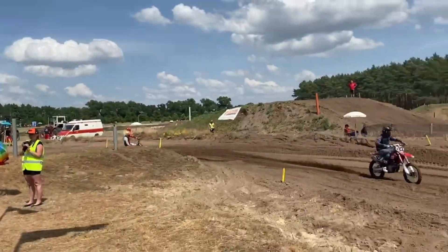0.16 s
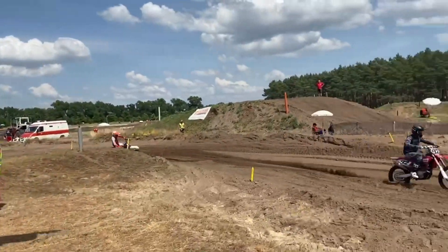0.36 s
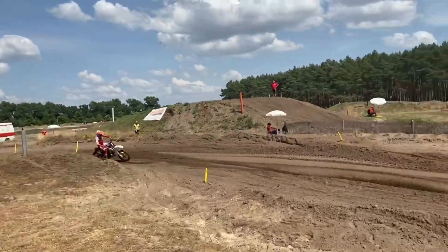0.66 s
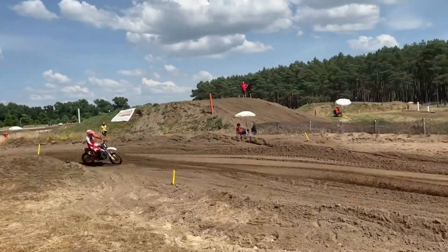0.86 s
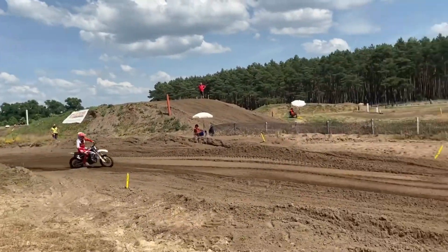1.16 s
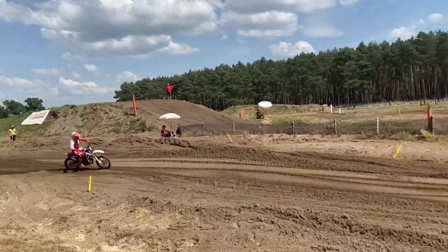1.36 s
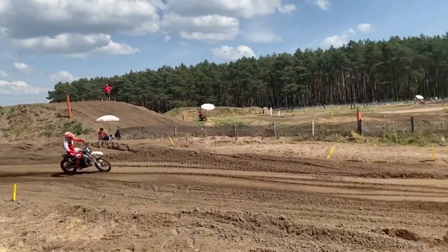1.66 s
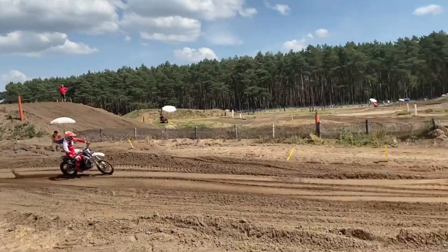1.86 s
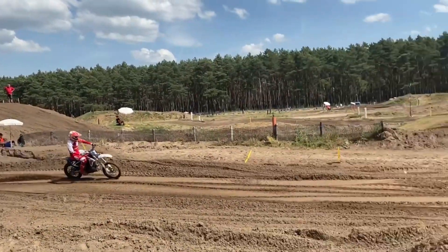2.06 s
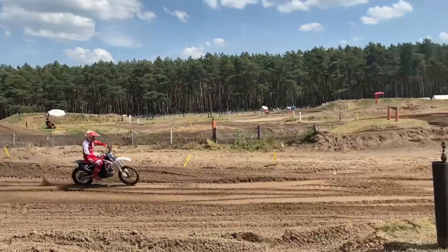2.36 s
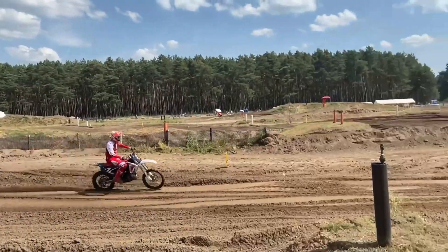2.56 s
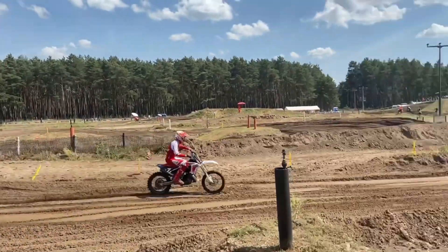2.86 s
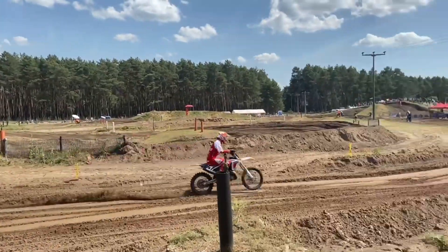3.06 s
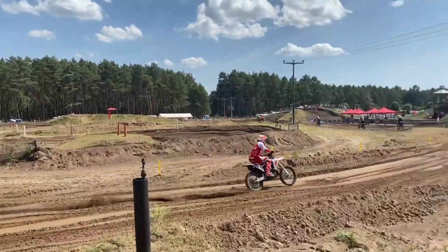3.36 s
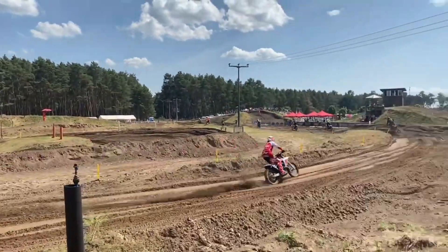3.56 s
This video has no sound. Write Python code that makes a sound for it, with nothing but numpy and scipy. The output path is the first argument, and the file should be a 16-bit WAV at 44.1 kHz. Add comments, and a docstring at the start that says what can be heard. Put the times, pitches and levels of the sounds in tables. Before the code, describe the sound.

Two motocross bikes pass close beside an outdoor dirt track. A thumping four-stroke shifts up and pulls away, then a howling two-stroke revs through gear changes with a hiss of thrown dirt. Other bikes drone in the distance.

```python
"""Two motocross bikes pass beside a dirt track, heard in stereo. First a thumping four-stroke shifts
up and pulls away, then a howling two-stroke spins its wheel, shifts and shuts the throttle. Each
firing of an engine is a click and a puff of noise that set its exhaust pipe ringing. Chain, intake
and thrown dirt add a rush, the dirt banks echo, and other bikes drone further off."""
import sys
import numpy as np
from scipy import signal
from scipy.io import wavfile
from scipy.ndimage import uniform_filter1d, map_coordinates

SR = 44100
rng = np.random.default_rng(int(sys.argv[2]) if len(sys.argv) > 2 else 0)


def bounce(signal):
    """Save signal as a 16-bit WAV file at the path given by the first command-line argument."""
    frames = np.transpose(np.atleast_2d(signal))
    limited = np.clip(frames, -1, 1)
    pcm = np.round(limited * 32767).astype(np.int16)
    wavfile.write(sys.argv[1], SR, pcm)


N = 163170
T = np.arange(N) / SR

# Engine speed. Each row: time in seconds, firings per second.
FOUR_STROKE_REVS = [(0, 63.57), (.12, 66.22), (.26, 68.16), (.345, 72.35), (.43, 68.32), (.61, 75.7),
                    (.66, 73), (.71, 68.37), (.8, 70.12), (1.02, 78.3), (1.1, 69), (1.21, 85),
                    (1.28, 70.75), (1.42, 63.3), (1.59, 66.52), (1.73, 64.7), (1.81, 70.44), (1.88, 70.87),
                    (2.0, 65.7)]
TWO_STROKE_REVS = [(1.2, 114.6), (1.42, 119.6), (1.55, 131), (1.68, 119.1), (1.78, 126.8), (1.86, 130.9),
                   (1.97, 131.5), (2.09, 135.2), (2.21, 113.4), (2.282, 141.7), (2.336, 122.2),
                   (2.4, 125.4), (2.606, 132.3), (2.66, 126), (2.8, 118.8), (2.854, 123), (2.94, 137),
                   (3.025, 153.5), (3.088, 132.8), (3.158, 145.7), (3.26, 148.4), (3.296, 141.9),
                   (3.49, 146.1), (3.6, 124.4)]
# Open throttle. Each row: start and end in seconds.
FOUR_STROKE_OPEN = [(-.1, 1.017), (1.152, 1.9)]
TWO_STROKE_OPEN = [(1.25, 1.54), (1.675, 2.098), (2.212, 3.503)]
# Each row: time in seconds, then boom, bark, crack and rattle levels in dB at open throttle.
FOUR_STROKE_LEVELS = [(0, -23, -29.5, -48, -40), (.27, -23.5, -24.5, -30, -33.5),
                      (.38, -21, -25, -43, -32.5), (.46, -16, -21, -38, -29), (.58, -18.5, -21, -34.5, -31),
                      (.66, -24.5, -31, -47, -38), (.82, -14.5, -19.5, -30, -30),
                      (1.02, -16.5, -19.5, -35, -23.5), (1.2, -16, -20.5, -37, -29.5),
                      (1.4, -16.5, -24, -25.5, -31.5), (1.6, -18, -31, -27.5, -46),
                      (1.88, -19.5, -27, -34.5, -45.5), (2.05, -49, -34, -56, -50)]
# Each row: time in seconds, then howl and upper overtone levels in dB at open throttle.
TWO_STROKE_LEVELS = [(1.2, -33, -39), (1.5, -32.5, -42), (1.72, -30, -47), (1.86, -27.5, -36),
                     (2.09, -25.5, -41.5), (2.23, -28, -43), (2.28, -22.5, -34), (2.34, -23.5, -33.5),
                     (2.6, -21.5, -31), (2.8, -28, -35.5), (2.91, -19.5, -30.5), (3.02, -23.5, -31.5),
                     (3.16, -27, -33.5), (3.3, -23.5, -30), (3.6, -24, -29)]
# Where each bike is. Each row: time in seconds, left side's delay in ms, left minus right in dB.
FOUR_STROKE_PLACE = [(0, 0.055, -3), (1.4, 0.41, -3), (2, 0.41, -1)]
TWO_STROKE_PLACE = [(2, -0.16, 0.24), (2.5, -0.21, -0.27), (3.2, -0.012, -1.98)]
# The four-stroke's pipe tones. Each row: multiple of the firing rate, relative level in dB.
PIPE_AHEAD = [(1, -9.5), (2, 4), (3, -8), (4, -5.5), (5, -15.5)]
PIPE_BEHIND = [(1, -9), (2, 0), (3, -9), (4, -3.5), (5, -8), (6, -23), (7, -19)]
# Loudness of the other parts. Each row: time in seconds, level in dB.
HUM_LEVELS = [(1.2, -45), (2.7, -31), (3.0, -28.5), (3.6, -25.5)]  # the two-stroke's lowest tones rise as its pipe turns to the listener
RUSH_LEVELS = [(1.2, -41), (1.32, -31), (1.55, -37), (1.75, -33.5), (2.1, -35.5), (2.3, -32), (2.45, -30.5),
               (2.75, -31.5), (2.95, -28), (3.1, -31.5), (3.6, -31)]
DRONE_LEVELS = [(0, -20.5), (1.8, -25.5), (2.6, -28), (2.9, -23), (3.15, -27), (3.7, -26.5)]
FAR_POPS = [(3.676, -18), (3.696, -19)]  # the four-stroke pops again, far away
# The tone colour of each part. Each row: frequency in Hz, relative level in dB.
BARK_COLOUR = [(300, -39), (420, -11), (560, -0.5), (740, 5), (900, -1), (1100, 2.5), (1300, 3.5),
               (1500, -2.5), (1750, -1), (2400, -11.5)]
CRACK_COLOUR = [(1600, -6), (2250, 5), (2900, 3), (4200, -1), (5500, -3), (8000, -14)]
RATTLE_COLOUR = [(2800, -7), (3450, 12), (4200, 1), (7500, -1.5), (16000, -15)]
HOWL_COLOUR = [(250, -48), (370, 11.5), (500, 9), (640, 11), (790, 15), (920, 14), (1040, 13.5), (1160, 9),
               (1290, 16.5), (1420, 7.5), (1600, -4.5)]
HUM_COLOUR = [(140, 5), (290, -1.5)]
UPPER_COLOUR = [(1400, -23.5), (1610, 16), (1800, 2.5), (2200, 6.5), (2700, -5.5)]
RUSH_BODY_COLOUR = [(900, -24), (2350, 0), (3600, 4), (4400, -0.5), (5300, 4), (6200, -3), (7000, 0.5),
                    (8300, -24.5)]
RUSH_TOP_COLOUR = [(8000, 2.33), (10000, 8.9), (16000, 9)]
DRONE_COLOUR = [(25, -24), (60, -7), (115, 5), (200, -5.5), (280, -6.5), (400, -21), (3000, -22),
                (16000, -56.5)]
# Thin parts ringing. Each row: start and end in seconds, pitch in Hz, level in dB.
RINGING_PARTS = [(1.298, 1.58, 5180, -40), (2.239, 2.383, 3580, -35), (2.6, 2.699, 3553, -35),
                 (2.75, 2.872, 3573, -28.5), (2.76, 3, 5300, -31.5)]


def four_stroke():
    """The pipe booms in low tones, and every firing adds a bark, a crack and a hissing rattle."""
    hz = curve(FOUR_STROKE_REVS) * (1 + 0.002256 * wander(12.0))
    clicks, puffs = firings(hz, jitter_ms=0.022, spread_db=0.9, puff_ms=1.4)
    angle = 2 * np.pi * (np.cumsum(hz) / SR - .4)
    turn = np.interp(T, (1.05, 1.47), [0, 1])  # the pipe swings round towards the listener
    ahead, behind = (unit_level(sum(gain_of(db) * np.cos(k * (angle - 0.62)) for k, db in tones))
                     for tones in (PIPE_AHEAD, PIPE_BEHIND))
    boom = -((1 - turn) * ahead + turn * behind) * level(FOUR_STROKE_LEVELS, 1)
    boom *= throttle(FOUR_STROKE_OPEN, open_ms=5.9, shut_ms=7.77, shut_db=-12.5)
    gate = throttle(FOUR_STROKE_OPEN, open_ms=3.7, shut_ms=11, shut_db=-11.5)
    bounced = echoed(clicks, delay_ms=2.244, share=0.45)  # off the ground
    bark = colour(bounced + (0.033 + 0.077 * turn) * puffs, BARK_COLOUR)
    bark = -shimmer(bark, depth_db=0.85, bins=8) * level(FOUR_STROKE_LEVELS, 2) * gate
    crack = colour(puffs + 7 * clicks, CRACK_COLOUR) * level(FOUR_STROKE_LEVELS, 3) * gate
    air = rng.standard_normal((3, N))  # shared, left, right
    hiss = (0.93 + 1.46 * turn) * unit_level(puffs) + air[0] + .5 * air[1:]
    rattle = colour(hiss, RATTLE_COLOUR) * level(FOUR_STROKE_LEVELS, 4) * gate
    sharp = placed(bark + crack, FOUR_STROKE_PLACE, pan_db=curve(FOUR_STROKE_PLACE, 2))
    return placed(boom, FOUR_STROKE_PLACE, pan_db=-2.6) + sharp + rattle


def two_stroke():
    """Fast, regular firings ring the exhaust pipe. Returns the sound and the firings' puffs."""
    hz = curve(TWO_STROKE_REVS) * (1 + 0.0021 * wander(25.6))
    clicks, puffs = firings(hz, jitter_ms=0.006, spread_db=0.2, puff_ms=1.33)
    pipe = echoed(clicks, delay_ms=500 / hz, share=0.28)  # the wave returns half a turn later
    howl = colour(pipe + .05 * puffs, HOWL_COLOUR)
    howl = shimmer(howl, depth_db=1.2, bins=6) * level(TWO_STROKE_LEVELS, 1)
    hum = colour(clicks, HUM_COLOUR) * level(HUM_LEVELS)
    upper = colour(clicks + 0.088 * puffs, UPPER_COLOUR) * level(TWO_STROKE_LEVELS, 2)
    # The tone at four times the firing rate booms in the pipe as the revs sag.
    growl = swell(2.5, 2.95, db=-25) * np.sin(2 * np.pi * 4 * np.cumsum(hz) / SR)
    gate = throttle(TWO_STROKE_OPEN, open_ms=3.1, shut_ms=2.0, shut_db=-21.5)
    engine = (howl + hum + upper + growl) * gate
    return placed(engine, TWO_STROKE_PLACE, pan_db=curve(TWO_STROKE_PLACE, 2)), puffs


def firings(hz, jitter_ms, spread_db, puff_ms):
    """A click for each firing, uneven in time and strength, and the puff of noise that follows it."""
    turns = np.cumsum(hz) / SR
    chance = rng.standard_normal((800, 2))[:int(turns[-1])]
    centres = np.interp(np.arange(len(chance)) + .5, turns, np.arange(N))
    centres += chance[:, 0] * jitter_ms * SR / 1000
    # A click can fall between samples, so it is spread over its neighbours.
    nearby = np.clip(centres.astype(int)[:, None] + np.arange(-8, 9), 0, N - 1)
    offset = nearby - centres[:, None]
    shape = np.sinc(offset) * np.cos(offset * np.pi / 18) ** 2
    clicks = np.zeros(N)
    np.add.at(clicks, nearby, gain_of(spread_db * chance[:, 1:]) * shape)
    fall = np.exp(-1000 / (puff_ms * SR))
    return clicks, signal.lfilter([1], [1, -fall], clicks) * rng.standard_normal(N)


def throttle(spans, open_ms, shut_ms, shut_db):
    """Loudness snaps up when the throttle opens and falls to a coasting level when it shuts."""
    opening = sum(np.clip((T - start) * 1000 / open_ms, 0, 1)
                  * np.exp(-np.maximum(T - end, 0) * 1000 / shut_ms) for start, end in spans)
    return gain_of(shut_db) + (1 - gain_of(shut_db)) * np.minimum(opening, 1)


def rush(puffs):
    """Chain, intake and thrown dirt hiss, pulsing with the two-stroke; thin parts ring now and then."""
    shared, left, right, shaking = rng.standard_normal((4, N))
    core = shimmer(shared + 0.12 * unit_level(puffs), depth_db=6.0, bins=2)
    core *= gain_of(0.5 * wander(37))  # the level flickers
    body = colour(np.array([core + left, core + 0.41 * right]), RUSH_BODY_COLOUR)
    late = placed(core, [(0, 0.1685)], pan_db=0)  # the treble reaches the left side slightly later
    top = colour(late + np.array([left, right]) / 4, RUSH_TOP_COLOUR) * gain_of(-1)
    gate = throttle(TWO_STROKE_OPEN, open_ms=24, shut_ms=14.4, shut_db=-30.0)
    rings = np.zeros(N)
    for start, end, hz, db in RINGING_PARTS:
        ring = signal.lfilter(*signal.iirpeak(hz, Q=120, fs=SR), shaking)
        rings += swell(start, end, db) * unit_level(ring)
    return (body + top) * level(RUSH_LEVELS) * gate + rings * gain_of([[1.5], [-1.5]])


def bank_echoes(x, fade_s=0.11):
    """The dirt banks scatter echoes, different ones on each side."""
    t = np.arange(SR // 4) / SR
    taps = rng.choice([-1., 1.], (2, len(t))) * (rng.random((2, len(t))) < .04)
    taps *= gain_of(-60 * t / fade_s) * (t > .004)
    echoes = signal.oaconvolve(x, taps / np.linalg.norm(taps[0]), axes=1)[:, :N]
    return signal.lfilter(*signal.butter(2, 250, "high", fs=SR), echoes)


def far_bikes(firing_hz=52.04):
    """Distance blurs two uneven engines into a drone; two lone pops come at the end."""
    clicks = sum(firings(hz * (1 + .05 * wander(4)), jitter_ms=0.42, spread_db=2.4, puff_ms=6.0)[0]
                 for hz in (firing_hz, 1.37 * firing_hz))
    thumps = signal.lfilter(*signal.butter(2, 500, fs=SR), clicks) / np.std(clicks)
    blur = rng.standard_normal((3, N))
    drone = colour(thumps + .5 * blur[0] + 0.3 * blur[1:], DRONE_COLOUR) * level(DRONE_LEVELS)
    pops, t = np.zeros(N + 900), np.arange(900) / SR
    for start, db in FAR_POPS:
        pops[round(start * SR):][:900] += gain_of(db) * np.exp(-t / 0.0037) * rng.standard_normal(900)
    return drone + signal.lfilter(*signal.butter(2, [800, 2700], "band", fs=SR), pops[:N])


def shimmer(x, depth_db, bins):
    """Resonances come and go as loose parts shake and the bike moves; more bins make them broader."""
    spectrum = signal.stft(x, nperseg=1024)[2]
    ripple = rng.standard_normal(spectrum.T.shape)
    ripple = uniform_filter1d(ripple, size=9 * bins // 2, axis=0)  # smooth over time
    ripple = uniform_filter1d(ripple, size=bins, axis=1)  # and over frequency
    spectrum *= gain_of(depth_db * unit_level(ripple).T)
    return unit_level(signal.istft(spectrum, nperseg=1024)[1][:N])


def colour(x, points):
    """Filters a sound to a tone colour, fading beyond the table's ends, and sets its level to one."""
    freqs, db = np.transpose(points)
    hz = np.abs(np.fft.fftfreq(8192, 1 / SR)) + 1
    octaves_outside = np.maximum(np.log2(freqs[0] / hz), 0) + np.maximum(np.log2(hz / freqs[-1]), 0)
    shape_db = np.interp(np.log(hz), np.log(freqs), db) - 24 * octaves_outside
    log_gain = np.log(gain_of(np.maximum(shape_db, -90)))
    # This filter rings only after a click, never before it.
    taps = np.fft.ifft(np.exp(np.conj(signal.hilbert(log_gain)))).real[:4096]
    return unit_level(signal.oaconvolve(x, taps[None] if x.ndim > 1 else taps)[..., :N])


def echoed(x, delay_ms, share):
    """Adds one weaker, later copy of the sound."""
    return x + share * np.interp(T - delay_ms / 1000, T, x)


def placed(x, place, pan_db):
    """The sound reaches two microphones at different times and levels."""
    left = map_coordinates(x, [np.arange(N) - curve(place) * SR / 1000], order=3, mode="nearest")
    return np.array([left * gain_of(pan_db / 2), x * gain_of(-pan_db / 2)])


def swell(start, end, db):
    """One smooth rise and fall in loudness."""
    return gain_of(db) * np.sin(np.pi * np.clip((T - start) / (end - start), 0, 1))


def wander(rate_hz):
    """A slow random drift, about one in size."""
    return unit_level(signal.lfilter(*signal.butter(2, rate_hz, fs=SR), rng.standard_normal(N)))


def level(rows, column=1):
    """Loudness from a dB column, silent outside the table's times."""
    inside = (T >= rows[0][0] - 1e-3) & (T <= rows[-1][0] + 1e-3)
    return gain_of(curve(rows, column)) * uniform_filter1d(inside * 1., 600, mode="nearest")


def curve(rows, column=1):
    """One column of a table, joined up over time."""
    return np.interp(T, [row[0] for row in rows], [row[column] for row in rows])


def gain_of(db):
    return 10 ** (np.asarray(db) / 20)


def unit_level(x):
    return x / np.sqrt(np.mean(x ** 2) + 1e-20)


def scene():
    """Both near bikes with their echoes, the rush and the far bikes."""
    howl, puffs = two_stroke()
    near = four_stroke() + howl
    return near + gain_of(-12) * bank_echoes(near) + rush(puffs) + far_bikes()


def record(dry, mic_db=2.7, cutoff_hz=16100):
    """The microphone boosts the sound, gently squashes its peaks and cuts the highest treble."""
    squashed = np.tanh(dry * gain_of(mic_db) / .98) * .98
    treble_cut = signal.firwin(511, cutoff_hz, window=("kaiser", 9), fs=SR)
    return signal.oaconvolve(squashed, treble_cut[None], "same")


dry = scene()
out = record(dry)
bounce(out)
```